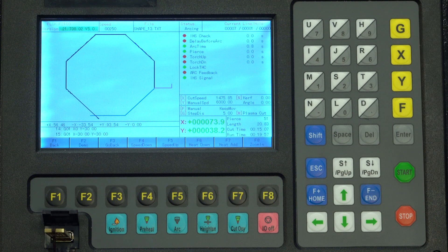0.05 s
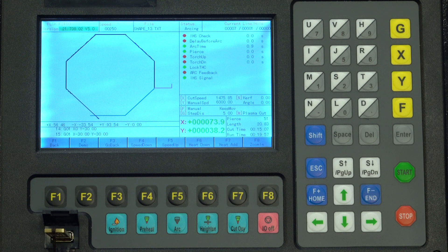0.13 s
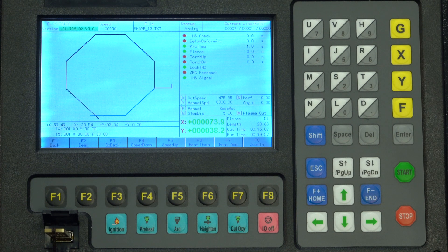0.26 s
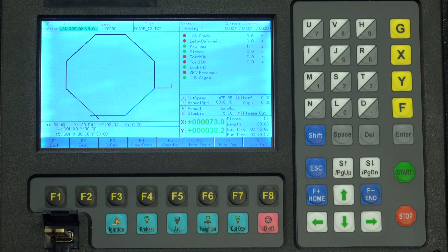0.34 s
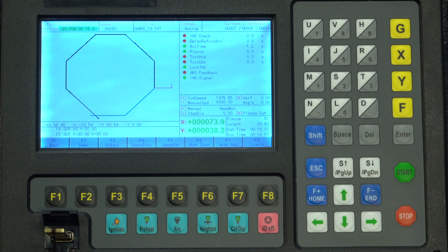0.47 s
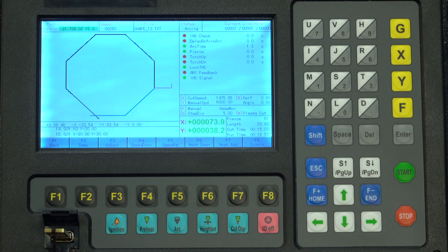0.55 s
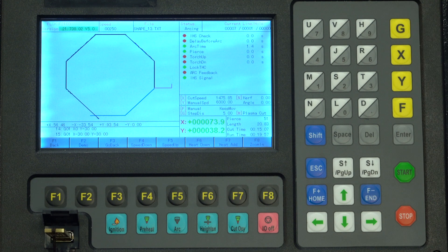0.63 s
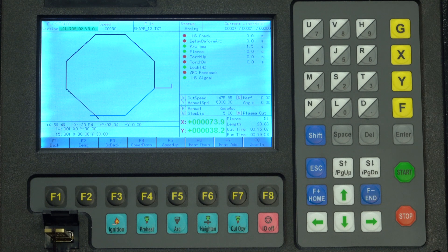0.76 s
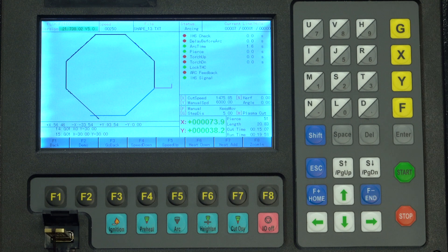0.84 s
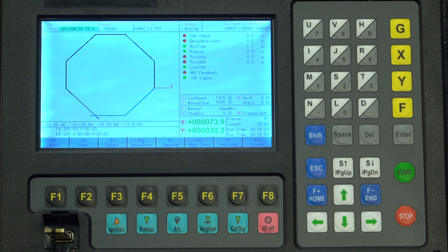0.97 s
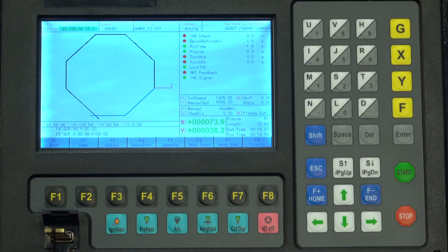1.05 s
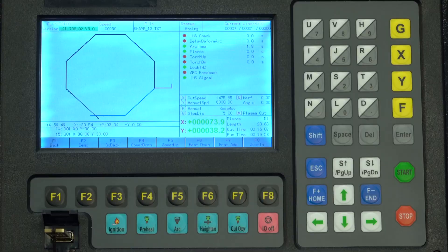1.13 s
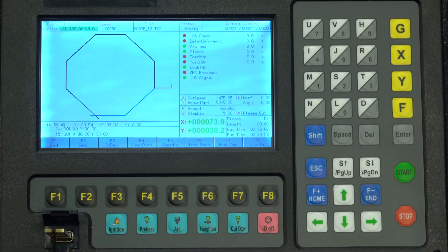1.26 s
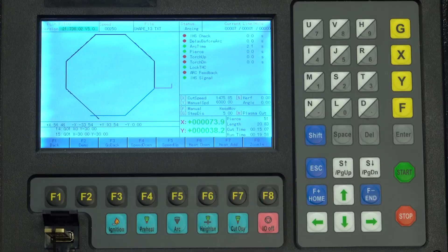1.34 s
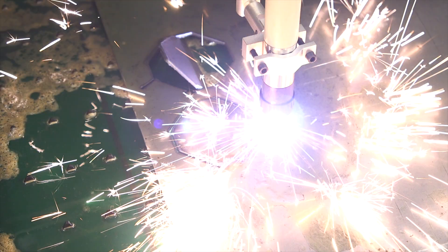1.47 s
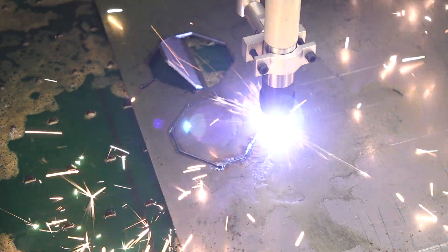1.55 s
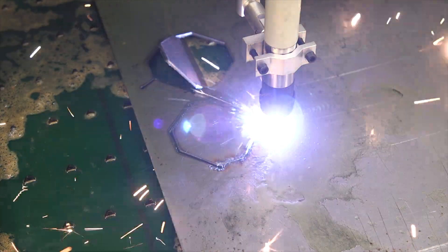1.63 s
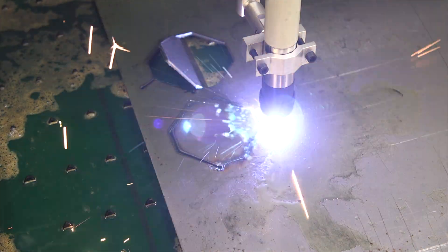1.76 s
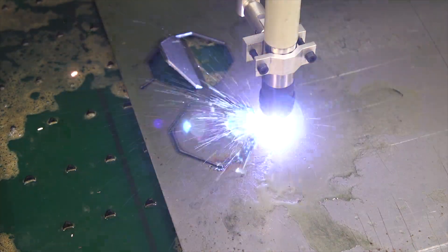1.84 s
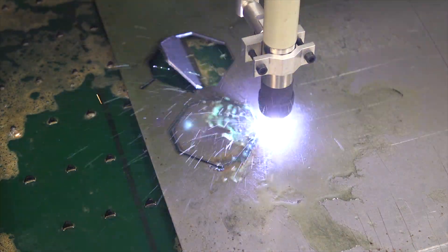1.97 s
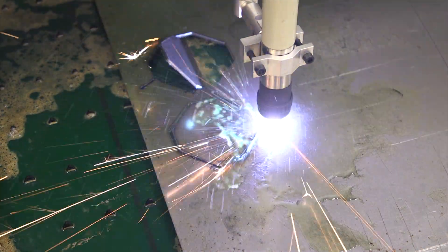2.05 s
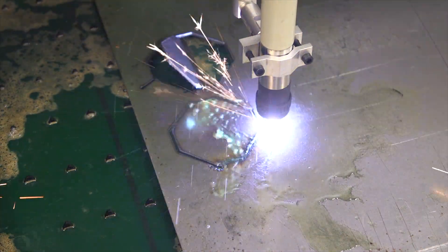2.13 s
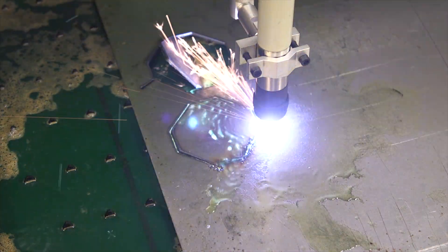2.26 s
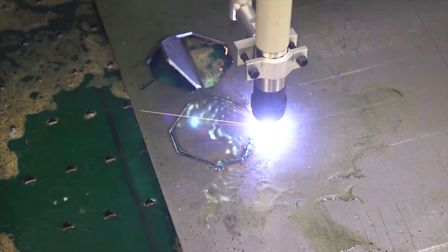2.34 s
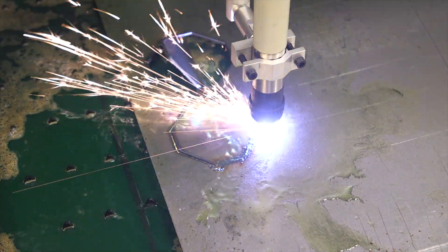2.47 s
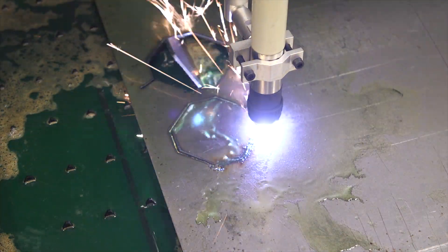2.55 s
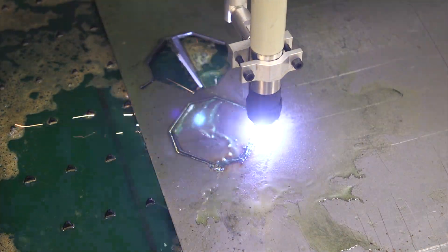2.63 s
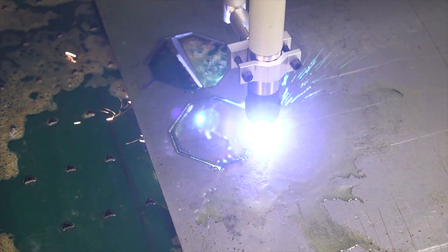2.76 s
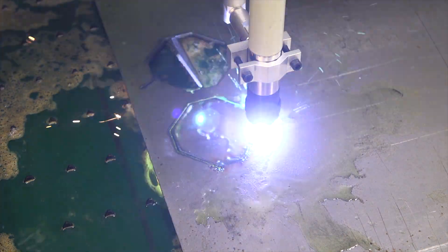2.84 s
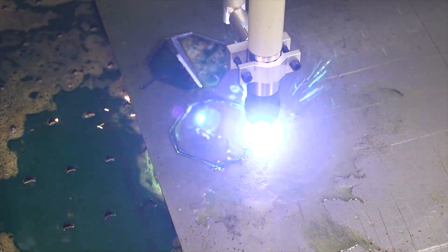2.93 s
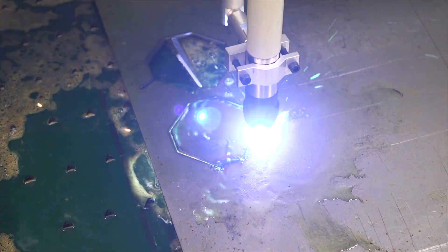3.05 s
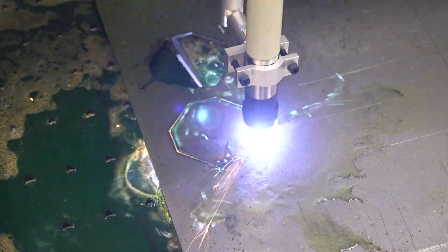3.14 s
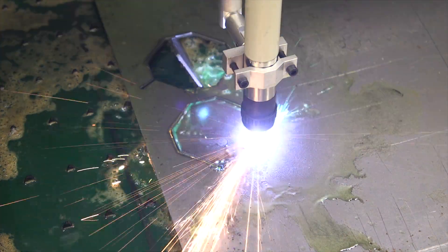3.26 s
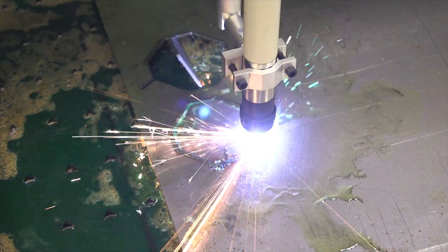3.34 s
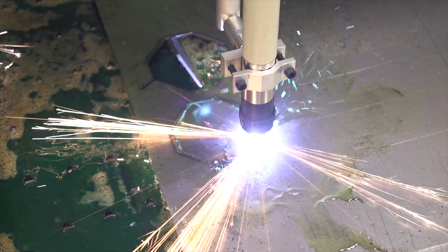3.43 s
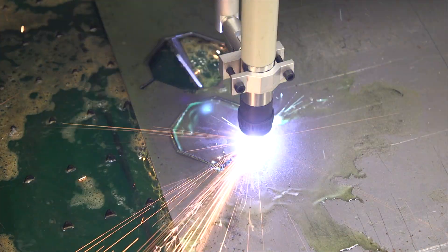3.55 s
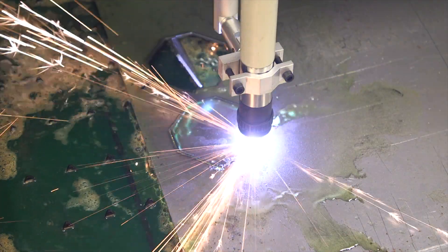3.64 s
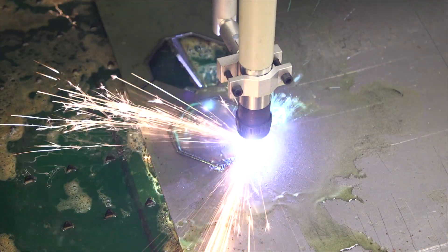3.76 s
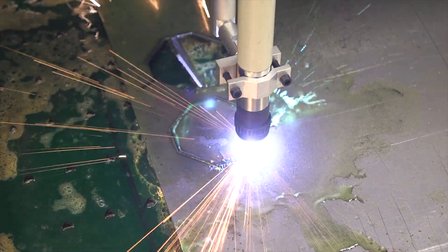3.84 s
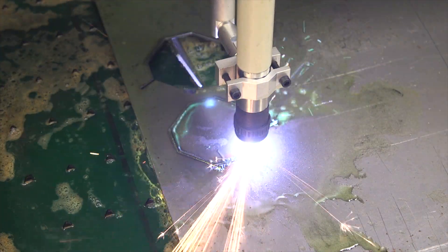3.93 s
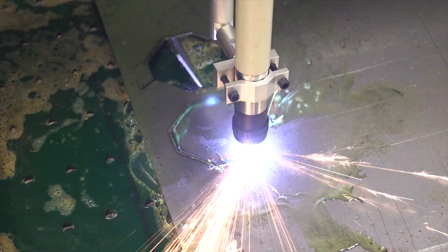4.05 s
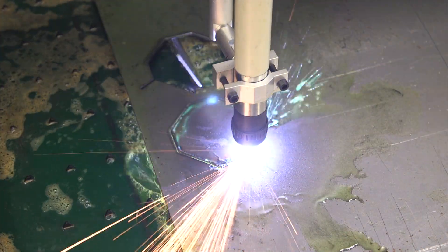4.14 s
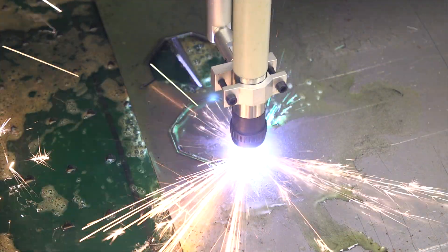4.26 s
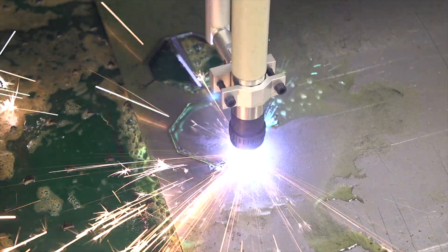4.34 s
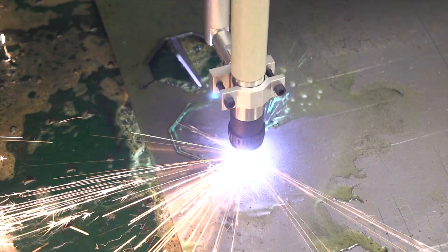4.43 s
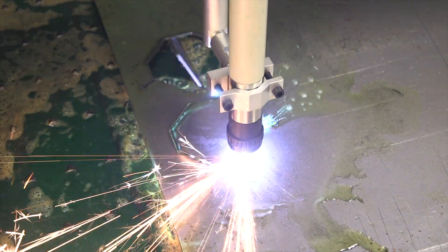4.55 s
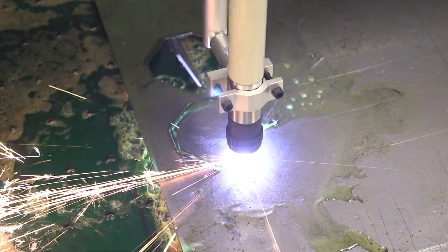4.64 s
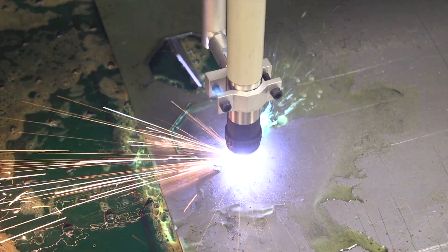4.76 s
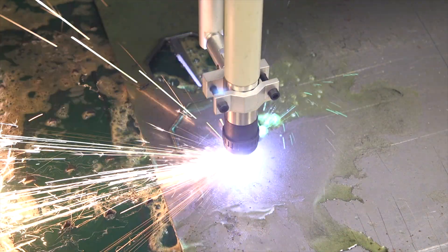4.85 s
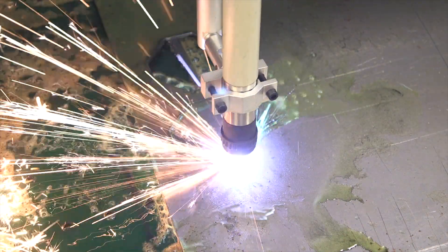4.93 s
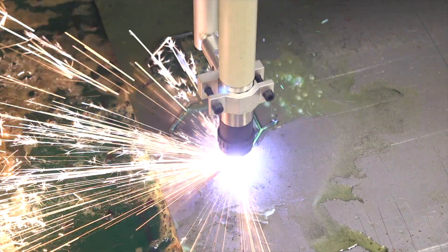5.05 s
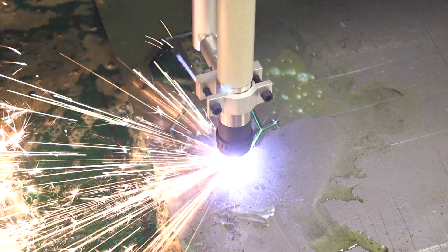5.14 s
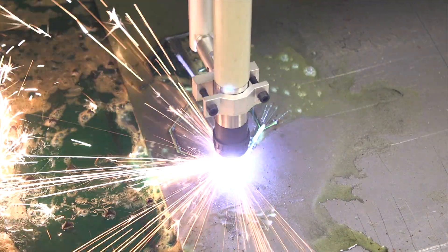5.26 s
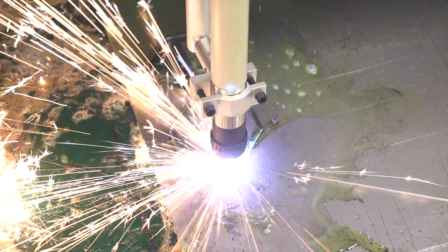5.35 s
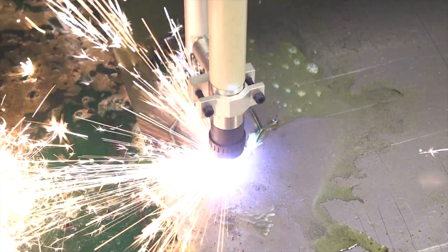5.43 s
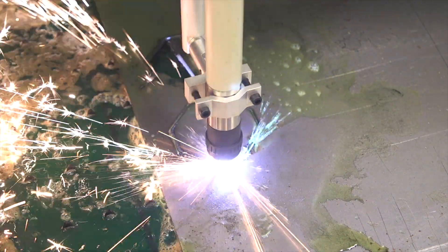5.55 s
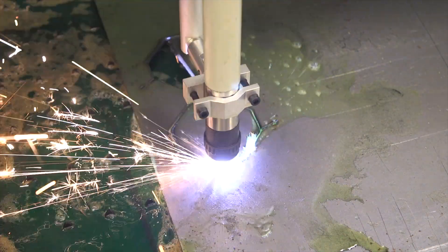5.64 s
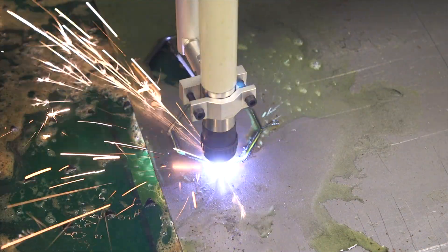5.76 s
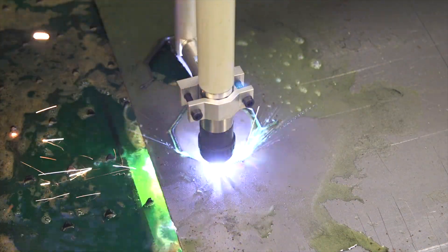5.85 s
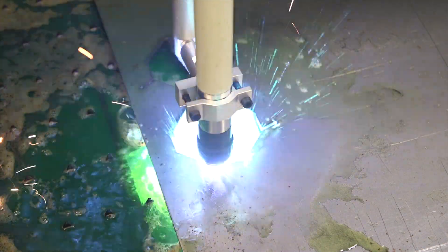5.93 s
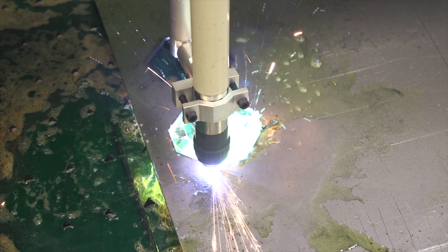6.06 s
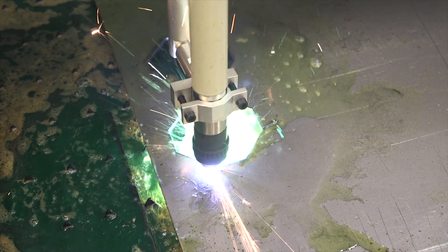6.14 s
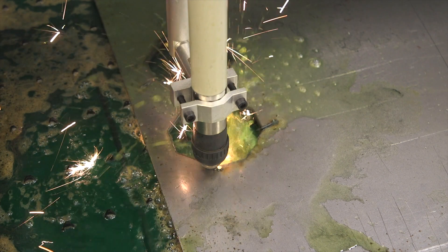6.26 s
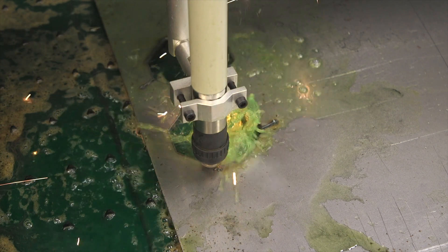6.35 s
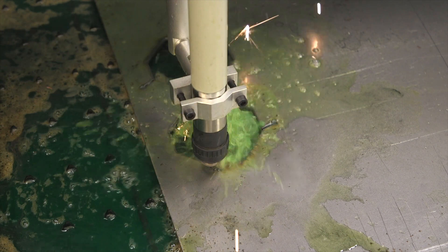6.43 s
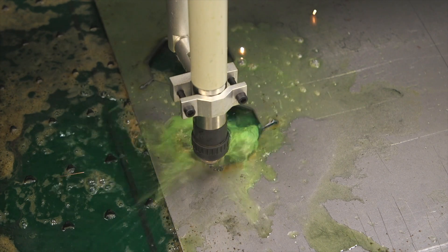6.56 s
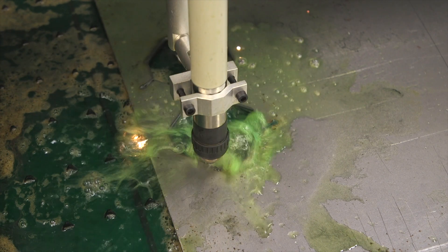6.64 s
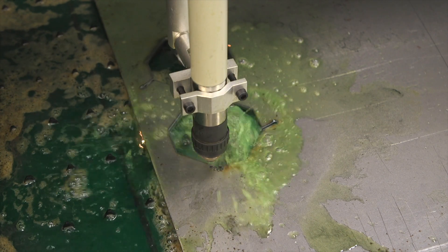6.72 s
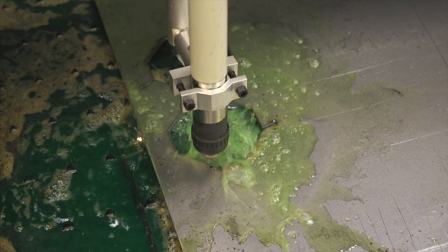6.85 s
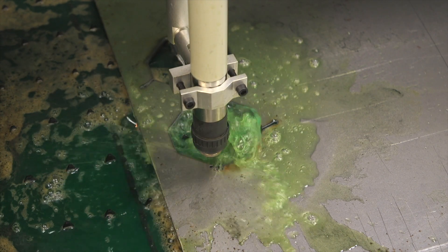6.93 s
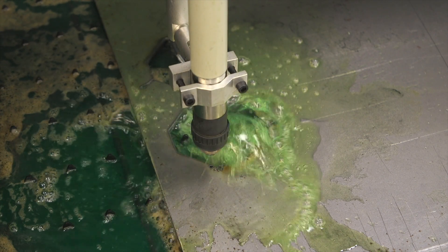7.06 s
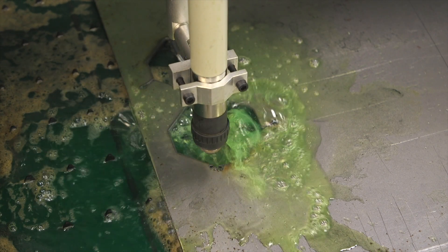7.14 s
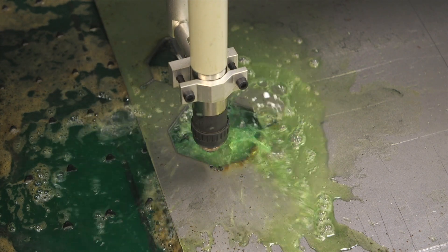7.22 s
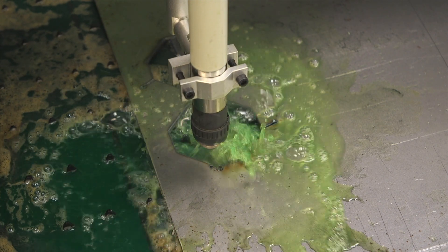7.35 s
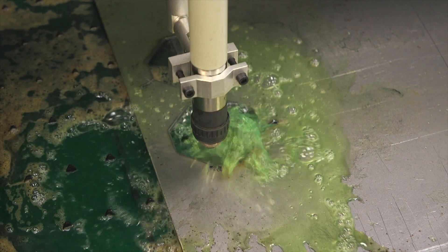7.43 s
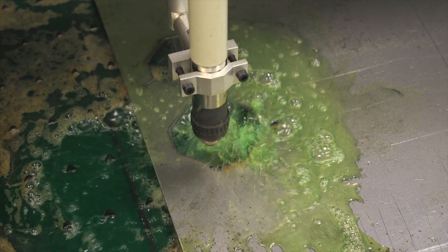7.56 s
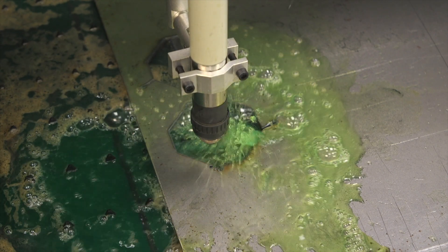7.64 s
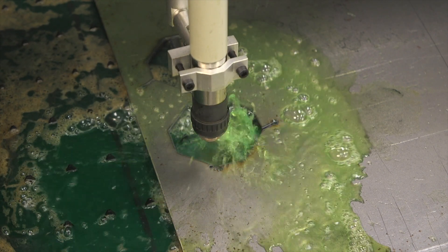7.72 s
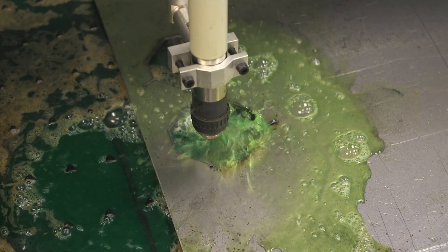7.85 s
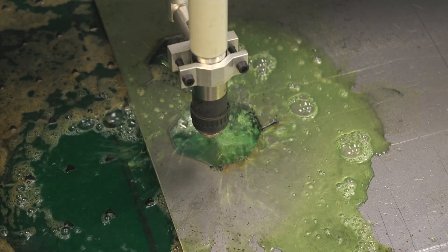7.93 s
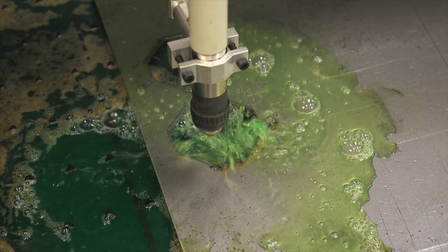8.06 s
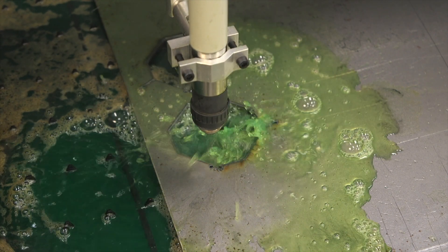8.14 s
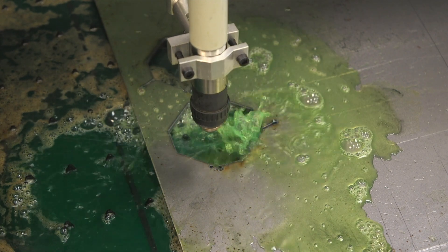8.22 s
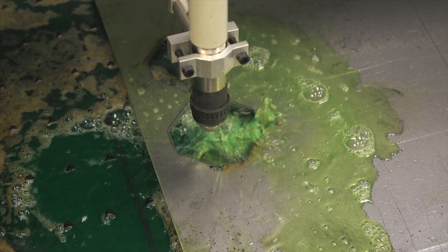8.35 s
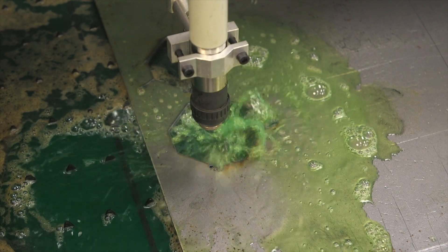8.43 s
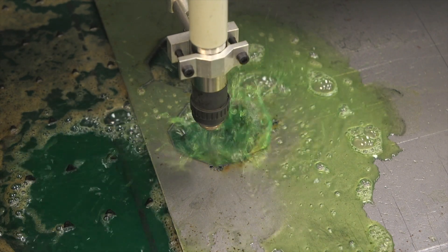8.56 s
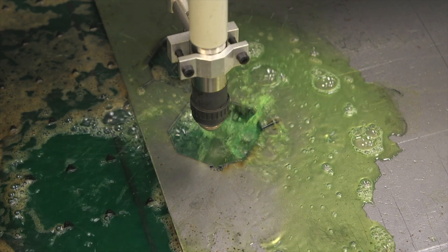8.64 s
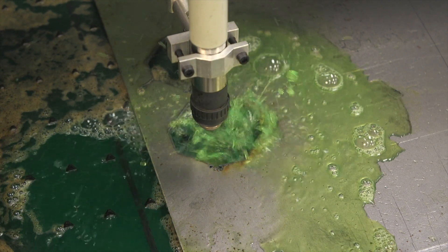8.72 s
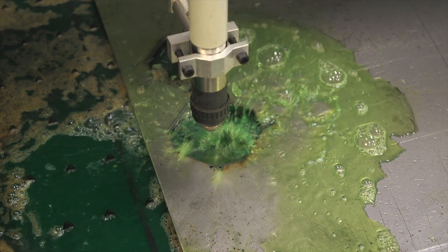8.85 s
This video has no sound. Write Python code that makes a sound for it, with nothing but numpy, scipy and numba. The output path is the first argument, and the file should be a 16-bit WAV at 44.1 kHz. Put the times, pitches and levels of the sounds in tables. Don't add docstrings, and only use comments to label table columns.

```python
import sys
import numpy as np
from scipy import signal
from scipy.fft import rfft, irfft, next_fast_len
from scipy.io import wavfile
from scipy.ndimage import uniform_filter1d
from numba import njit

SR = 44100
rng = np.random.default_rng(int(sys.argv[2]) if len(sys.argv) > 2 else 0)


def waveform_to_disk(signal):
    frames = np.transpose(np.atleast_2d(signal))
    scaled = np.clip(frames, -1, 1) * 32767
    samples = np.round(scaled).astype(np.int16)
    wavfile.write(sys.argv[1], SR, samples)


def to_linear_factor(level_db):
    exponent = np.asarray(level_db, float) / 20
    return 10 ** exponent


N = 392049
T = np.arange(N) / SR

# start_s, hiss_peak_db, fall_s, knock_db, thump_db
STRIKE = [
    (1.2685, -57, .04, -57, -58),
    (1.2931, -32, 0.009, -40, -36),
    (1.298, -46, .08, -52, -64),
    (1.3577, -33, 0.044, -48, -34),
    (1.3644, -32, 0.013, -42, -53),
    (1.3725, -19, 0.0021, -47, -56),
]
# time_s, level_db
ARC = [(1.39, -32), (1.42, -21.5), (1.5, -20), (1.7, -26.5), (2.06, -26.5), (2.44, -20.5), (2.66, -25),
       (2.76, -29), (3.15, -27.5), (3.26, -22.5), (4.15, -21.5), (4.83, -24), (5.3, -20.5), (5.55, -21),
       (5.86, -23), (5.94, -26), (6.02, -23.5), (6.29, -20.5)]
# time_s, level_db
AIR = [
    (6.3, -33.5),
    (6.37, -38),
    (6.95, -30),
    (7.01, -31),
    (7.11, -29),
    (7.47, -26.5),
    (7.47, -27.5),
    (8.87, -34.5),
    (8.89, -33),
]


def unit(x):
    return x / np.sqrt(np.mean(x ** 2))


def track(table, silent_db=-140):
    s, *columns = np.transpose(table)
    return [np.interp(T, s, c, silent_db, silent_db) for c in columns]


def coloured(points, lo_hz=10, hi_hz=20000, steep=6):
    size = next_fast_len(N)
    f = np.maximum(np.arange(size // 2 + 1) * SR / size, 1)
    hz, db = np.transpose(points)
    edges = ((1 + (lo_hz / f) ** (2 * steep)) * (1 + (f / hi_hz) ** (2 * steep))) ** -.5
    colour = to_linear_factor(np.interp(np.log(f), np.log(hz), db))
    return unit(irfft(rfft(rng.standard_normal(size)) * colour * edges, size)[:N])


def walk(rate):
    k = int(SR / rate)
    held = np.repeat(rng.standard_normal(N // k + 1), k)
    return 1.98 * uniform_filter1d(uniform_filter1d(held, k), k)[:N]


def gate(s, length, rise=0.018, fall=.02):
    return np.clip(np.minimum(1 + (T - s) / rise, 1 - (T - s - length) / fall), 0, 1)


@njit
def svf(x, hz, sharp):
    y, b, l = np.empty(len(x)), 0., 0.
    for i in range(len(x)):
        g = np.tan(np.pi * hz[i] / SR)
        v = (b + g * (x[i] - l)) / (1 + g * (g + 1 / sharp))
        b, l, y[i] = 2 * v - b, l + 2 * g * v, v / sharp
    return y


@njit
def ring(start, hz, size, t60, glide, floor):
    y = np.zeros(N)
    for k in range(len(start)):
        a, phase, f, fall = size[k], 0., hz[k], floor ** (1 / (t60[k] * SR))
        for i in range(start[k], min(N, start[k] + int(t60[k] * SR))):
            y[i] += a * np.sin(phase)
            phase += 2 * np.pi * f / SR
            f, a = f + glide * hz[k] / (t60[k] * SR), a * fall
    return y


def resonant(x, modes):
    size = next_fast_len(N)
    f = np.arange(size // 2 + 1) * SR / size
    boost_db = sum(db / (1 + (2 * (f - hz) / width) ** 2) for hz, width, db in modes)
    return irfft(rfft(x, size) * to_linear_factor(boost_db), size)[:N]


def hall(x):
    level_db, t60_s = -9, .22
    t = T[:SR // 2]
    tail = rng.standard_normal(len(t)) * np.exp(-np.log(1000) * t / t60_s)
    tail = tail * np.clip((t - .004) / 0.00105, 0, 1)
    tail = signal.lfilter([1, -1], [1, -.99], tail)
    tail = signal.lfilter([1], [1, -.15], tail)
    return x + to_linear_factor(level_db) * signal.fftconvolve(x, tail / np.sqrt(np.sum(tail ** 2)))[:N]


def workshop():
    # time_s, level_db
    load = [
        (0, -53),
        (.094, -54),
        (.294, -62.5),
        (.36, -60.5),
        (.42, -58),
        (.684, -54.5),
        (.812, -59.5),
        (.84, -65),
        (1.275, -77),
    ]
    # freq_hz, density_db
    room_colour = [(15, -33), (25, 2), (66, 2), (144, -7), (370, -9), (746, -6), (1090, -20), (15700, -49)]
    # freq_hz, density_db
    drive_colour = [(530, -42), (900, -6), (1080, -2), (1200, -12), (1320, -7), (3240, -21), (6500, -36),
                    (14300, -120)]
    # freq_hz, width_hz, level_db
    gear_modes = [(1085, 31, -2), (1315, 26, 0), (1610, 36, -3), (2120, 60, -8), (3120, 60, -16),
                  (3340, 40, -11), (4150, 80, -21), (4500, 60, -19)]
    # freq_hz, level_db
    fan_tones = [(258, -71.5), (646, -70), (748.3, -56.5)]
    # start_s, length_s, level_db
    whine_spans = [(.11, .13, -75), (.29, .11, -78), (.77, .08, -79)]
    # start_s, peak_db, pitch_hz
    tick_events = [(0.2189, -46, 2800), (0.3092, -55, 3690), (0.5194, -44, 3350), (0.6244, -50, 7000),
                   (0.6774, -48, 3260), (1.0774, -42, 4900)]
    fan_level_db, quieter_from_s, quieter_db_per_s = -59, .83, -28
    gear_per_db, full_load_db = 1.5, -54.5
    drive_hiss_db, whine_hz = -15, 11999

    drive_db = track(load)[0]
    before_strike = T < load[-1][0]
    fan_db = fan_level_db + quieter_db_per_s * np.maximum(T - quieter_from_s, 0)
    fan_db = np.where(before_strike, fan_db, -140)
    fan = sum(to_linear_factor(db + 5.5 + .45 * walk(10.7)) * np.sin(2 * np.pi * hz * T + .45 * walk(9.1))
              for hz, db in fan_tones)
    room = to_linear_factor(-56.5) * before_strike * coloured(room_colour) + to_linear_factor(57 + fan_db) * fan

    noise = rng.standard_normal(N)
    gears = sum(to_linear_factor(db + 1.4 * walk(12)) * unit(svf(noise, np.full(N, 1. * hz), hz / width))
                for hz, width, db in gear_modes)
    drive = to_linear_factor(-3.5) * coloured(drive_colour, 880, 7000)
    drive = drive + to_linear_factor(gear_per_db * (drive_db - full_load_db)) * unit(gears)
    hiss = coloured([(6000, -10), (9000, -1.5), (14000, 3), (16000, -1.5)], 6000, 16000)
    whine = sum(to_linear_factor(db) * gate(s, length) for s, length, db in whine_spans)
    whine = whine * np.sin(2 * np.pi * whine_hz * T)

    s, db, hz = np.transpose(tick_events)
    ticks = ring((s * SR).astype(np.int64), hz, to_linear_factor(db), np.full(len(s), .0015), 0., 1e-3)
    return room + to_linear_factor(drive_db) * drive + to_linear_factor(drive_db + drive_hiss_db) * hiss + whine + ticks


def strike():
    # freq_hz, level_db re thump, t60_s
    valve = [(297, -8, 0.077), (738, -4, 0.11), (4850, -14, .06), (4960, -7, .07), (5200, -13.5, .05),
             (6860, -6, .04), (25, 5.5, 0.44)]
    puff_hz, puff_sharp = 12500., 1.6
    out = np.zeros(N)
    hz, db, t60 = np.transpose(valve)
    knock = unit(svf(rng.standard_normal(N), np.full(N, 1100.), 1.0))
    puff = unit(svf(rng.standard_normal(N), np.full(N, puff_hz), puff_sharp))
    for s, peak_db, fall, knock_db, thump_db in STRIKE:
        since = np.maximum(T - s, 0)
        rise = 1 - np.exp(-since / 0.0027)
        out += rise * to_linear_factor(peak_db) * np.exp(-since / fall) * puff
        out += rise * to_linear_factor(knock_db) * np.exp(-since / 0.044) * knock
        out += ring(np.full(len(hz), int(s * SR)), hz, to_linear_factor(db + thump_db), t60, 0., 0.0012)
    return out


def pockets(table, cycles, glide, gain_db):
    s, db, hz = np.transpose(table)
    late, split = rng.random((len(s), 2)).T
    first = ring((s * SR).astype(np.int64), hz, to_linear_factor(db + gain_db), cycles / hz, glide, 0.0025)
    second_start = ((s + 8 * late / hz) * SR).astype(np.int64)
    second_hz = hz * (.93 + .14 * split)
    return first + ring(second_start, second_hz, to_linear_factor(db + gain_db - 4.5), cycles / hz, glide, 0.003)


def tank(rumble_db):
    # start_s, peak_db, pitch_hz
    large = [(1.533, -16.5, 532), (1.637, -16.5, 441), (1.783, -12, 441), (1.836, -10.5, 533),
             (1.907, -25, 339), (2.022, -23, 318), (2.079, -14.5, 374), (2.147, -16, 371),
             (2.215, -12.5, 609), (2.252, -15, 534), (2.332, -12, 738), (2.439, -13, 530),
             (2.564, -20, 611), (2.62, -15, 650), (2.697, -17, 587), (2.788, -12.5, 350), (3.121, -16, 434),
             (3.213, -12.5, 440), (3.307, -16.5, 427.5), (3.434, -14, 404), (3.505, -15, 440),
             (3.559, -12, 650), (3.612, -18, 406), (3.686, -15, 406), (3.808, -12, 635), (3.928, -24, 503),
             (3.996, -12.5, 445), (4.071, -13, 630), (4.171, -14, 619), (4.234, -13, 414),
             (4.372, -19, 664), (4.419, -18, 430), (4.499, -13, 543), (4.544, -19, 676),
             (4.651, -12.5, 557), (4.736, -16, 650), (4.776, -12, 662), (4.885, -16.5, 581),
             (4.964, -17.5, 490), (5.041, -12.5, 345), (5.231, -15, 428), (5.301, -10, 674),
             (5.416, -14, 645.6)]
    # start_s, peak_db, pitch_hz
    deep = [(1.7, -21, 250), (1.856, -19, 222), (1.891, -21, 217), (1.93, -23, 218)]
    # start_s, peak_db, pitch_hz
    pops = [(1.7816, -17, 1230), (2.0317, -23, 1060), (2.1964, -14, 1396), (2.367, -17, 1275),
            (2.4368, -17, 1240), (2.584, -17, 1110), (2.6608, -17, 1234), (2.7571, -21, 1310),
            (3.0549, -25, 1160), (3.1102, -20, 1330), (3.1662, -21, 940), (3.2964, -13, 1400),
            (3.4405, -15, 1220), (3.5056, -11, 1415), (3.5576, -17, 1230), (3.7309, -19, 1070),
            (3.7932, -21, 1030), (3.9519, -19, 1190), (3.992, -14.5, 1477), (4.0884, -15, 1210),
            (4.1429, -17, 1200), (4.1983, -15, 1410), (4.2602, -17, 1430), (4.318, -18, 1050),
            (4.4176, -15, 1080), (4.4867, -10.5, 1320), (4.637, -10.5, 1320), (4.6835, -12.5, 1304),
            (4.7316, -16, 1079), (4.8084, -10, 1154), (5.1084, -16, 1080), (5.1487, -14, 1200),
            (5.1881, -18, 1200), (5.337, -13, 1190), (5.552, -19, 1067), (5.8351, -22, 1004),
            (5.9848, -22, 1540), (6.1184, -11.5, 1500), (6.2377, -12, 1320), (6.2769, -11.5, 1058)]
    gulps = pockets(large, cycles=45, glide=.2, gain_db=-4.5)
    gulps = gulps + pockets(deep, cycles=50, glide=-.04, gain_db=-2.5)
    gulps = gulps + pockets(pops, cycles=57, glide=0.1, gain_db=-4)
    drone = to_linear_factor(-56) * (T > ARC[0][0]) * coloured([(20, -2), (60, -1)], 17, 48.0, steep=2.6)
    rumble = coloured([(20, -3), (45, -5), (85, -6.5), (170, -6.0)], 25, 270, steep=0.99)
    return to_linear_factor(rumble_db + 0.46 * walk(3.12)) * rumble + drone + gulps


def swoop():
    # start_s, length_s, from_hz, to_hz, level_db
    gusts = [
        (1.45, .11, 3200, 500, -29),
        (5.9, .075, 1300, 240, -23),
    ]
    noise, out = rng.standard_normal(N), 0
    for s, length, from_hz, to_hz, db in gusts:
        hz = from_hz * (to_hz / from_hz) ** np.clip((T - s) / length, 0, 1)
        out = out + to_linear_factor(db + 8.5) * gate(s, length) * svf(noise, hz, 1.9) * np.sqrt(SR / hz / 40)
    return out


def splashes():
    # start_s, length_s, centre_hz, level_db
    patches = [(6.51, .03, 4600, -45.5), (6.718, 0.025, 4600, -46), (6.737, 0.028, 2500, -51),
               (6.91, .05, 2900, -51), (6.9, .04, 5200, -48), (7.152, .06, 2900, -45),
               (7.3, .05, 3600, -46), (7.42, .06, 3600, -49)]
    out = np.zeros(N)
    for s, length, hz, db in patches:
        on = slice(int((s - .03) * SR), int((s + length + .05) * SR))
        spray = unit(svf(rng.standard_normal(on.stop - on.start), np.full(N, 1. * hz), 5.3))
        out[on] += to_linear_factor(db) * gate(s, length, .015, 0.028)[on] * spray
    return out


def bubbles(hz, span, count, spread, cycles, scatter_db, sharp, swirl_db):
    when, pitch, size = rng.random(count), rng.standard_normal(count), rng.exponential(size=count)
    length_s = span[1] - span[0]
    start = np.minimum((span[0] + when * length_s) * SR, N - 1).astype(np.int64)
    f = hz[start] * np.exp(spread * pitch)
    grains = ring(start, f, to_linear_factor(scatter_db * np.minimum(size, 3.2)), cycles / f, 0.23, 0.0037)
    swirl = svf(rng.standard_normal(N), hz, sharp) * to_linear_factor(.8 * walk(14))
    swirl = swirl * np.sqrt(length_s * SR / N)
    return unit(svf(unit(grains) + to_linear_factor(swirl_db) * unit(swirl), hz, sharp))


def water(big_db, big_hz, small_db, froth_db, span, modes, small_hz, froth_hz, tight, count):
    small_hz = small_hz * (1 + walk(6) / 80)
    froth_hz = froth_hz * (1 + walk(6) / 90)
    big = bubbles(np.clip(big_hz, 200, 900), span, count, 0.3164, 19.3, 1.77, 0.9, swirl_db=3.0)
    small = bubbles(small_hz, span, 2 * count, 0.181 / tight, 38.0, 2.84, 0.79 * tight, swirl_db=-0.1)
    froth = bubbles(froth_hz, span, 2 * count, 0.146 / tight, 33.0, 2.8, 0.87 * tight, swirl_db=6)
    surge = to_linear_factor(-5 + 0.3 * walk(11))
    return resonant(surge * (to_linear_factor(big_db) * big + to_linear_factor(small_db) * small + to_linear_factor(froth_db) * froth), modes)


def jet(shear_db, nozzle_db, spray_db, colour, flicker_db):
    spray_hz, nozzle_hz, shear_hz = 2260, 6120, 8900
    flutter = flicker_db * walk(11.0)
    shear = to_linear_factor(0.43 * walk(20)) * coloured(colour, shear_hz, steep=6.8)
    nozzle = to_linear_factor(nozzle_db + 0.91 * walk(18)) * coloured(colour, nozzle_hz, shear_hz, steep=5.24)
    spray = to_linear_factor(spray_db + 0.87 * walk(16)) * coloured(colour, spray_hz, nozzle_hz, steep=2.4)
    return to_linear_factor(shear_db + flutter) * (shear + nozzle + spray)


def cooling():
    # time_s, share
    flood = [(6.29, 0.079), (6.7, 0.13), (7, 0.3), (7.265, 0.45), (7.3, 0.94), (7.8, 0.87), (8.3, 0.88),
             (8.6, 0.87), (8.89, 0.87)]
    # start_s, length_s, level_db
    spits = [(6.38, .03, 4.5), (6.518, 0.088, 3), (6.73, 0.013, 0), (6.86, 0.058, -2), (7.002, 0.048, 3.5),
             (7.24, 0.034, 1.5)]
    # freq_hz, width_hz, boost_db
    hole = [(920, 160, 4.2), (1110, 44, 2.5), (1245, 34, 2.2), (1444, 37, 1.5), (1715, 70, 4.7),
            (1840, 68, 2.6), (1960, 79, 2.9), (2080, 37, 2.3), (2330, 61, 5.9), (2710, 92, 6.1)]
    # freq_hz, density_db
    air_colour = [(1530, -20), (2600, -5.5), (4080, -10), (7730, -18.5), (12400, -4), (14000, -3.5),
                  (15600, -3.5)]
    # start_s, peak_db, pitch_hz
    bloops = [(6.4124, -29, 1150), (6.583, -28, 1200), (6.6462, -26, 1060), (6.7436, -33, 965),
              (6.8043, -39, 1070), (7.1331, -31, 1140), (7.2714, -32, 1220), (7.44, -21.5, 1304),
              (7.5114, -25, 1230), (7.6359, -27, 1460), (7.6958, -27, 1140), (7.759, -30, 1270),
              (7.796, -31, 1270), (7.8554, -31, 1320), (7.898, -28, 1250), (7.973, -28, 1460),
              (8.039, -35, 1330), (8.1388, -31.5, 1130), (8.3039, -29.5, 1150), (8.4276, -27, 1260),
              (8.4719, -24.5, 1170), (8.6621, -25.5, 1160), (8.707, -20, 1270), (8.82, -35, 1180)]
    # start_s, peak_db, pitch_hz
    blips = [(6.3997, -35, 1730), (6.4716, -31, 2020), (6.5045, -33, 1800), (6.7407, -32, 2350),
             (6.8183, -37, 1810), (6.8577, -34, 1810), (6.8891, -30, 2860), (6.9674, -33, 1910),
             (7.2618, -30, 2050), (7.3396, -24, 1710), (7.454, -24, 1810), (7.5676, -21, 1970),
             (7.61, -21, 1974), (7.728, -26, 1980), (7.796, -25, 2050), (7.882, -21, 1760),
             (8.0012, -16, 1860), (8.1622, -22, 1840), (8.2001, -20.5, 2080), (8.2331, -22, 1980),
             (8.2827, -28, 1830), (8.3812, -26, 1790), (8.493, -26, 1720), (8.6257, -26, 1900),
             (8.7394, -24, 2130), (8.8132, -24, 1884)]
    # start_s, peak_db, pitch_hz
    glugs = [(6.447, -32, 589), (6.681, -35, 824), (6.795, -43, 719), (6.951, -41, 673), (7.055, -42, 746),
             (7.402, -37, 773), (7.535, -38, 832), (7.628, -40, 848), (7.724, -39, 824), (7.862, -42, 816),
             (8.206, -41, 657), (8.407, -37, 672.5), (8.568, -42, 789), (8.674, -42, 751)]
    # start_s, peak_db, pitch_hz
    fizzes = [(6.9353, -34, 3030), (7.2645, -34, 2570), (7.3543, -29, 2340), (7.4416, -30, 2280),
              (7.5568, -32, 2410), (7.6576, -26, 2760), (7.7279, -31, 2400), (7.8836, -29, 2630),
              (7.9923, -30, 2670), (8.144, -31, 2860), (8.1994, -32, 2240), (8.2562, -34, 2530),
              (8.4603, -29, 2610), (8.821, -32, 2360)]
    slosh_peak_db, slosh_fall_s, snuff_peak_db, snuff_fall_s = 11.5, 0.41, 5.5, 0.037
    froth_lag_s = .24
    s, share = np.transpose(flood)

    def wet(dry_db, flooded_db, lag_s=0):
        return dry_db + (flooded_db - dry_db) * np.interp(T - lag_s, s, share)

    def patchy():
        return .7 * walk(14)

    since = np.maximum(T - s[0], 0)
    spit_db = sum(db * gate(start, length) for start, length, db in spits)
    snuff_db = np.where(T > s[0], snuff_peak_db * np.exp(-since / snuff_fall_s), -99)
    slosh_db = snuff_db + slosh_peak_db * np.exp(-since / slosh_fall_s)
    big_db = wet(-47, -51.5) + slosh_db
    small_db = wet(-51, -38.5) + slosh_db + patchy()
    froth_db = wet(-50, -32.5, froth_lag_s) + snuff_db + spit_db + patchy()
    bath = water(big_db, wet(716, 794), small_db, froth_db, (s[0], N / SR), hole,
                 small_hz=1165, froth_hz=1898, tight=1.98, count=800)
    bath = bath + pockets(bloops, cycles=87, glide=0.11, gain_db=-5.5)
    bath = bath + pockets(blips, cycles=102, glide=.08, gain_db=-5.5)
    bath = bath + pockets(glugs, cycles=35, glide=.2, gain_db=-2)
    bath = bath + pockets(fizzes, cycles=130, glide=.05, gain_db=-3.5)
    nozzle_db, spray_db = wet(-2.5, -18), wet(-11.5, -13) + .4 * spit_db
    hiss = jet(track(AIR)[0], nozzle_db, spray_db, air_colour, flicker_db=0.14)
    return bath + to_linear_factor(1.5) * splashes() + hiss


def ridged(x):
    # start_s, length_s, centre_hz, width_hz, boost_db
    ridges = [(1.36, 1.4, 14350, 800, 6.5), (1.32, 0.43, 10900, 400, 5.5), (1.4, .45, 12600, 350, 3),
              (2.112, .55, 12700, 450, 7), (3.05, 2.89, 15000, 1000, 6.5), (3.5, 0.895, 10350, 450, 4),
              (4.9, 1.4, 10200, 460, 3.5), (4.2, 1.02, 5560, 300, 3), (5.4, .35, 6500, 450, 7),
              (5.4, 0.32, 7500, 1100, 4), (3, 2.56, 12800, 520, 5), (1.47, 1.34, 7600, 500, 2.5),
              (2.15, 0.56, 10800, 500, 4)]
    creep_per_s = .014
    y = x.copy()
    for s, length, hz, width, db in ridges:
        on = slice(int(s * SR), int((s + length) * SR))
        lift = (to_linear_factor(db + 0.35 * walk(3.55)) - 1) * gate(s + .1, length - .2, 0.089, 0.11)
        y[on] += lift[on] * svf(x[on], hz * (1 + creep_per_s * (T[on] - s)), hz / width)
    return y


def reflected(x):
    # delay_ms, share
    echoes = [(.35, 0.08), (.75, 0.04), (1.0, 0.06), (1.25, 0.069), (1.45, 0.097), (2.3, 0.11), (3.7, .09),
              (7.6, 0.042), (8.2, 0.045), (8.8, 0.25), (12.2, 0.017)]
    y, place = x.copy(), np.arange(N)
    for ms, share in echoes:
        delay = ms * SR / 1000 * (1 - 0.0131 * (T - 4)) + 1.33 * walk(0.63)
        y += share * np.interp(place - delay, place, x)
    return y / np.sqrt(1 + sum(share ** 2 for _, share in echoes))


def cutting():
    # freq_hz, density_db
    arc_colour = [(1530, -36), (2600, -6), (2930, -10.5), (4430, -5), (5900, -6.5), (8710, -5), (12800, 2),
                  (15600, 0.5)]
    # freq_hz, width_hz, boost_db
    nozzle_modes = [(4520, 220, 2.5), (6283, 30, 4), (6504, 23, 4.6), (7085, 30, 4), (7420, 40, 4),
                    (7794, 30, 4), (9550, 30, 3.5)]
    # freq_hz, width_hz, boost_db
    plate = [(226, 20, 6.5), (348.4, 35, 6), (437, 17, 2), (539, 25, 5), (620, 22, 4), (665, 38, 6),
             (733, 16, 5.5), (830, 28, 6), (1074, 74, 2.5), (1200, 36, 2), (1330, 36.9, 4.5), (1500, 65, 3),
             (2230, 84, 3.5), (2464, 82, 5)]
    # start_s, length_s, nozzle_db, spray_db, rumble_db
    turns = [(5.45, 0.21, 4, 0, -0.5), (4.3, 0.34, 2, 0.5, -3), (2.74, 0.24, -2, -2.5, 0.5),
             (1.45, .08, -1, -5, -3.5), (2.29, 0.27, -0.5, 1.5, 4), (3.4, 1, -0.5, 0, -4.5)]
    # time_s, level_db, pitch_hz
    churn = [(1.42, -52, 661), (1.53, -29.5, 512), (1.74, -27.5, 420), (1.84, -20, 482), (1.89, -24, 360.7),
             (1.98, -29.5, 440), (2.15, -23, 414), (2.21, -21.5, 542), (2.64, -26.5, 602), (2.83, -25, 397),
             (3.03, -27, 480), (3.14, -25, 483), (3.9, -26, 564), (3.97, -22, 397), (4.06, -24, 602),
             (5.18, -25.5, 525), (6.18, -31, 620), (6.29, -31, 550)]
    # start_s, length_s, boost_db
    bursts = [(1.46, 0.072, 4.5), (1.686, 0.023, 6), (1.79, 0.04, 11), (3.8, .1, 3.5), (1.893, 0.059, 5.5),
              (2.178, 0.28, 5), (2.585, 0.049, 11.5), (3.107, 0.24, 6.5), (3.421, 0.16, 6.5),
              (3.686, 0.072, 8.5), (3.96, 0.18, 5.5), (4.191, 0.31, 8), (4.604, 0.28, 7.5), (5.07, 0.23, 6),
              (5.31, 0.11, 8.5), (5.453, 0.45, 5.5), (2.433, 0.04, 5.5), (6.021, 0.24, 12),
              (6.21, 0.071, 3.5)]
    usual_jet_db, rumble_built_s, early_rumble_db = -23.5, 2.4, -4
    calm_db = -59
    arc_on_s, arc_off_s = ARC[0][0], ARC[-1][0]

    churn_db, churn_hz = track(churn)
    bared = gate(5.345, 0.52, .01, .04)
    rebound = gate(5.985, 0.034, .008, 0.054)
    collapse = gate(5.5, 0.33, 0.061, .08)
    jet_db = track(ARC)[0] + 2.8 * bared
    excess_db = jet_db - usual_jet_db
    nozzle_db, spray_db, turn_db = sum(np.outer(db, gate(s, length, .1, 0.21))
                                       for s, length, *db in turns)
    hiss = jet(jet_db, -8.5 + nozzle_db, -12 + spray_db + 3.4 * bared, arc_colour, flicker_db=0.13)

    fits_db = sum(db * gate(s, length, rise=0.026, fall=0.038) for s, length, db in bursts)
    small_db = np.where(churn_db > -99, -33.5 + 0.27 * (churn_db + 26) + fits_db, churn_db)
    froth_db = -37 + 1.5 * excess_db + 9.3 * rebound + 0.22 * fits_db + 3.5 * bared
    bath = water(churn_db - 1.7 * collapse, churn_hz, small_db, froth_db, (arc_on_s, arc_off_s), plate,
                 small_hz=1253, froth_hz=2144, tight=1.0, count=1400)

    rumble_db = -39 + 1.35 * excess_db + turn_db + early_rumble_db * gate(0, rumble_built_s - .4, 1, .4)
    rumble_db = np.where(T > arc_off_s, calm_db, rumble_db)
    return reflected(ridged(resonant(hiss, nozzle_modes))) + bath + tank(rumble_db) + swoop()


def scene():
    mono = workshop() + hall(strike() + cooling() + cutting())
    return np.array([mono, mono])


def side_noise():
    shop_db, cutting_db, cooling_db = -77, -83, -70.5
    s, length, treble_start_db, sag_db_per_s = 0.6134, 0.9, -67, -33
    stage = np.searchsorted([STRIKE[0][0], AIR[0][0] + .1], T)
    bass_db = np.array([shop_db, cutting_db, cooling_db])[stage]
    treble_db = treble_start_db + np.maximum(sag_db_per_s * 2 * (T - s), -18)
    treble_db = treble_db - 60 * (1 - gate(s, length, .01, .01))
    bass = coloured([(60, -5), (500, 3)], 70, 350, steep=3.3)
    treble = coloured([(500, -7), (1500, 5), (5000, -5), (12000, -30)], 500, 9000)
    return to_linear_factor(bass_db) * bass + to_linear_factor(treble_db) * treble


def slipped_bands(dry):
    count, level_db, width_share = 26, -3.5, .17
    side = np.zeros(N)
    frame = np.sin(np.pi * np.arange(2048) / 2048) ** 2
    half = len(frame) // 2
    for u, v in zip(rng.random(count), np.linspace(0, 1, count)):
        s, lo_hz = 2.3 + 6.2 * u, 4100 + 9700 * v ** .85
        hi_hz = min(lo_hz + 700 + width_share * lo_hz / 2, 15200)
        i = int(s * SR) - half
        earlier = dry[0, i - half:i + half]
        band = signal.cheby2(8, 50, (lo_hz - 250, hi_hz + 250), "bandpass", fs=SR, output="sos")
        side[i:i + len(frame)] += to_linear_factor(level_db) * frame * signal.sosfilt(band, earlier)
    return side


def band_limit(x):
    return signal.sosfilt(signal.butter(12, 17090, fs=SR, output="sos"), x)


def record(dry):
    side = side_noise() + slipped_bands(dry)
    top = signal.ellip(12, .3, 75, 15760, fs=SR, output="sos")
    mix = signal.sosfilt(top, dry + side * np.array([[1], [-1]]))
    return band_limit(mix)


dry = scene()
out = record(dry)
waveform_to_disk(out)
```